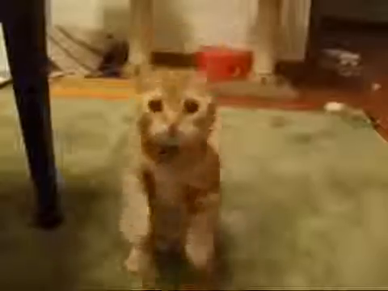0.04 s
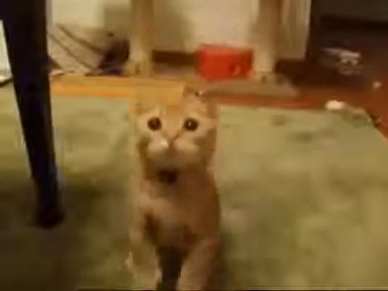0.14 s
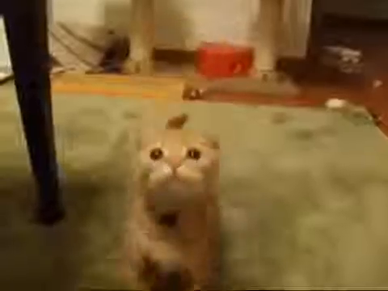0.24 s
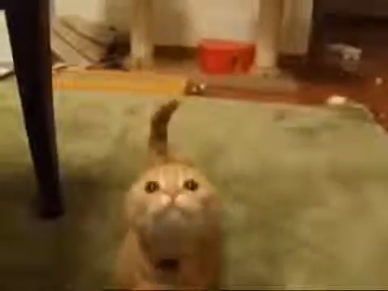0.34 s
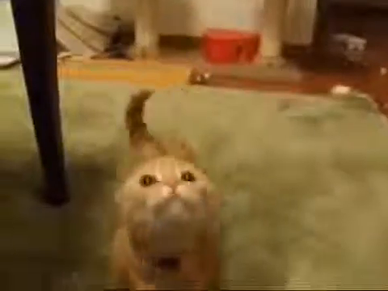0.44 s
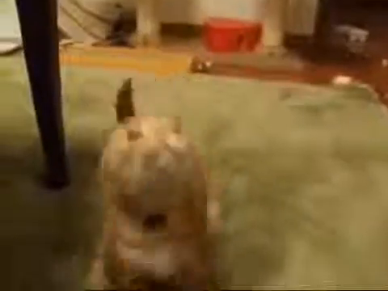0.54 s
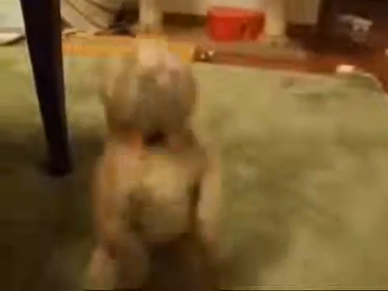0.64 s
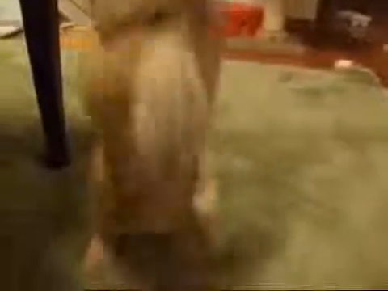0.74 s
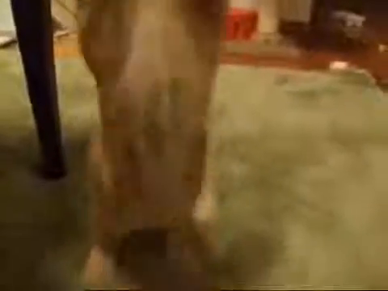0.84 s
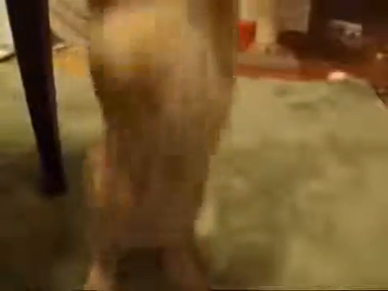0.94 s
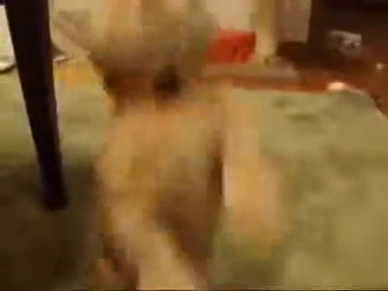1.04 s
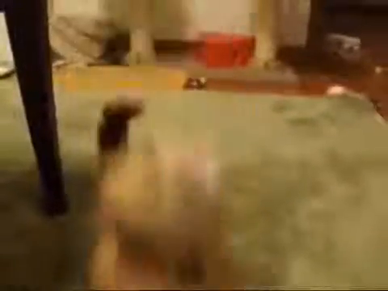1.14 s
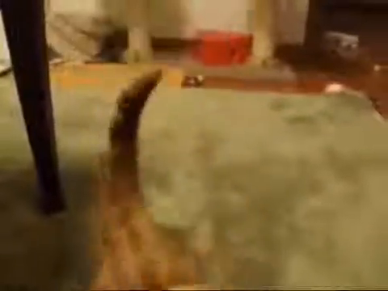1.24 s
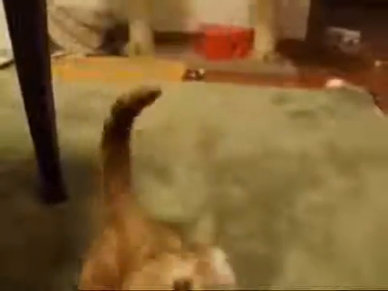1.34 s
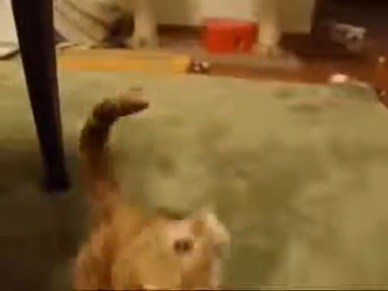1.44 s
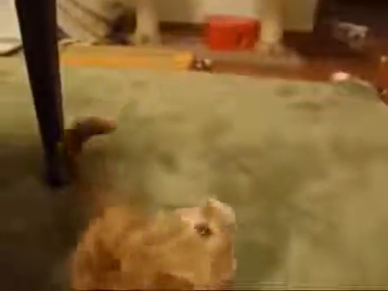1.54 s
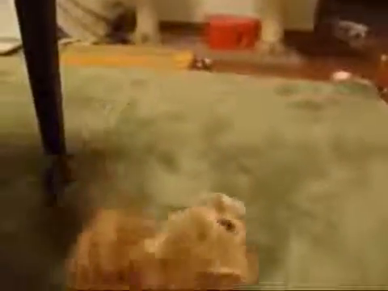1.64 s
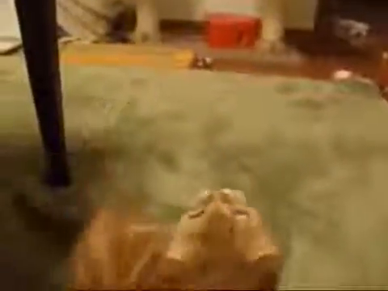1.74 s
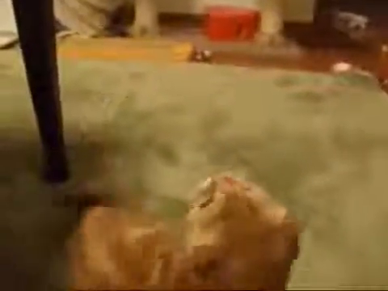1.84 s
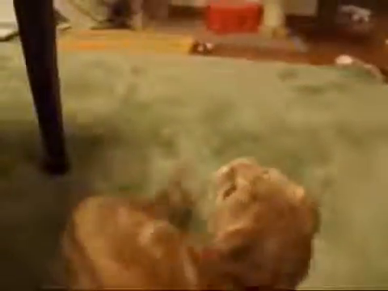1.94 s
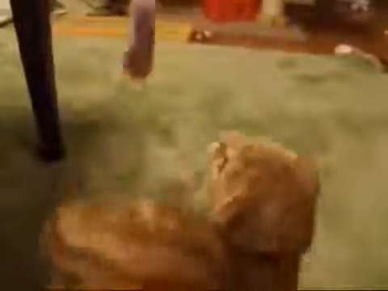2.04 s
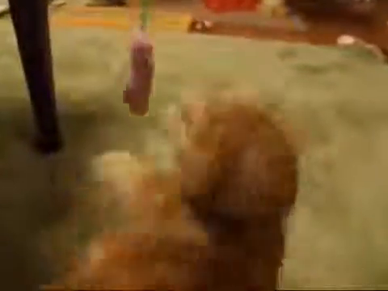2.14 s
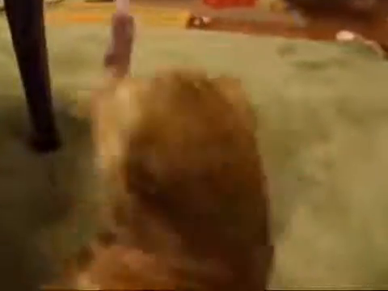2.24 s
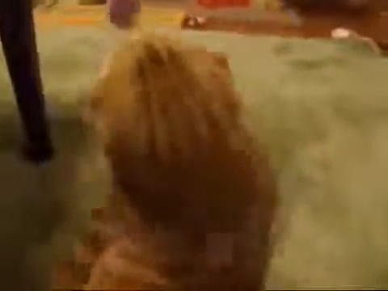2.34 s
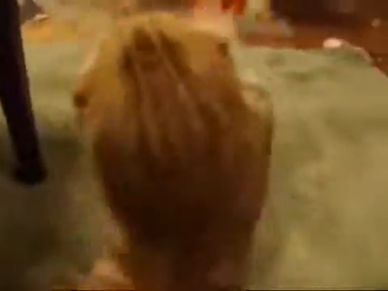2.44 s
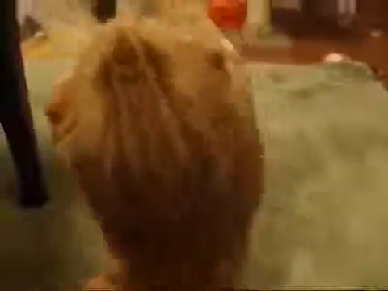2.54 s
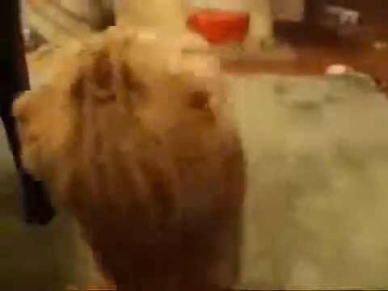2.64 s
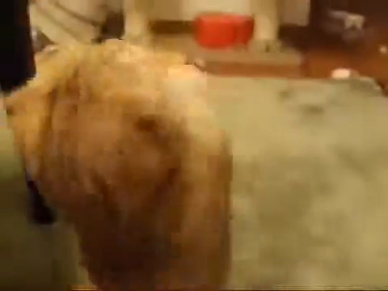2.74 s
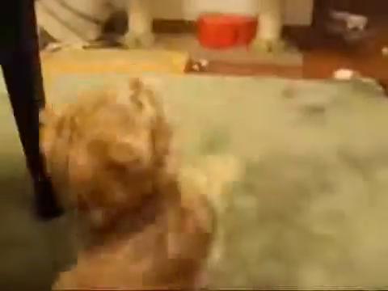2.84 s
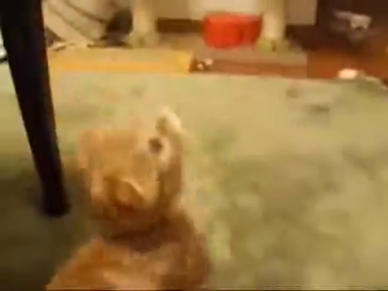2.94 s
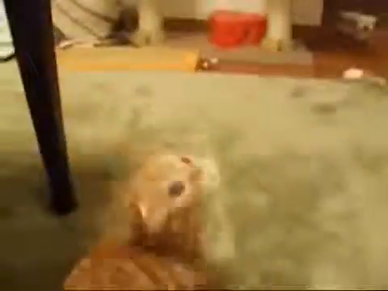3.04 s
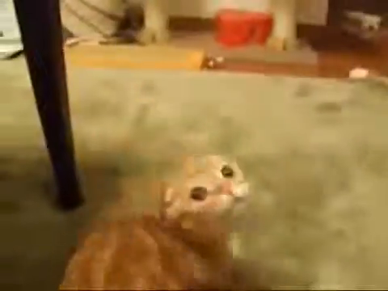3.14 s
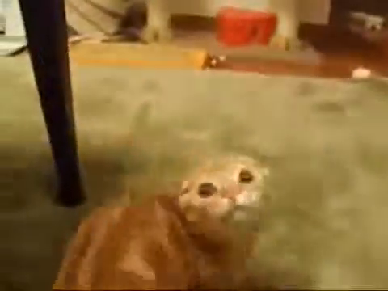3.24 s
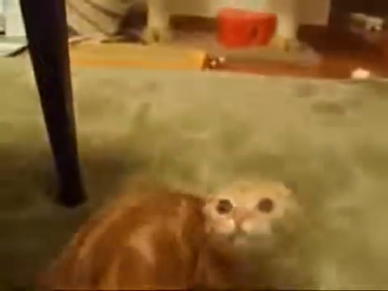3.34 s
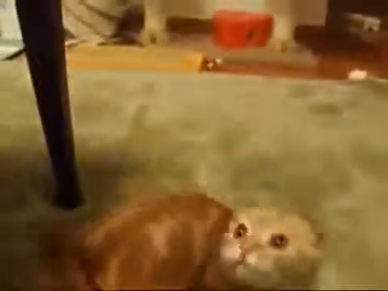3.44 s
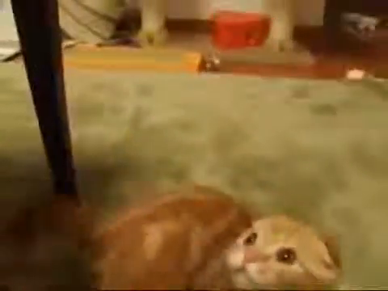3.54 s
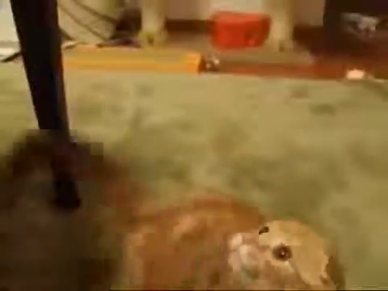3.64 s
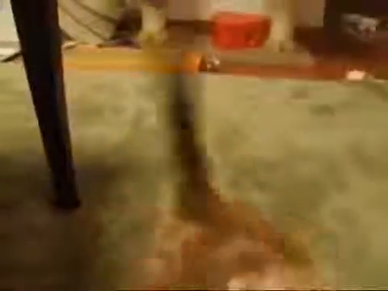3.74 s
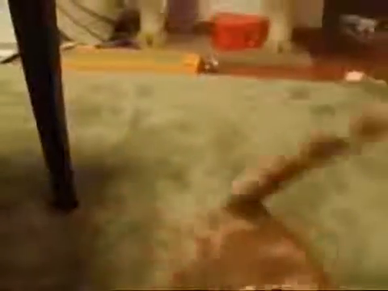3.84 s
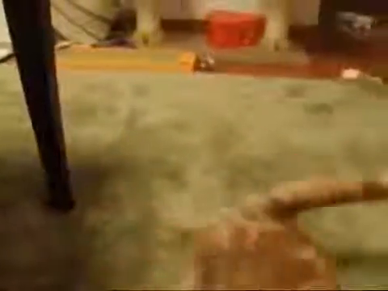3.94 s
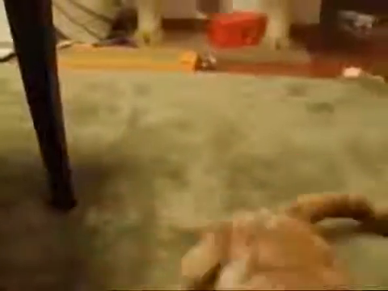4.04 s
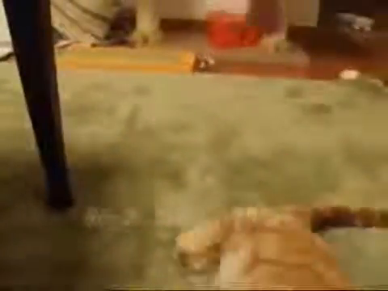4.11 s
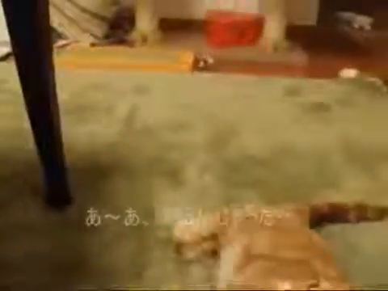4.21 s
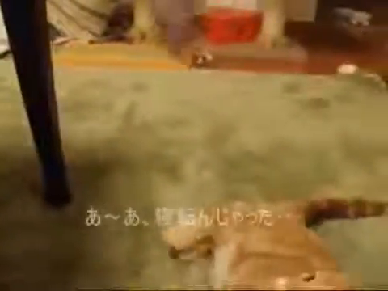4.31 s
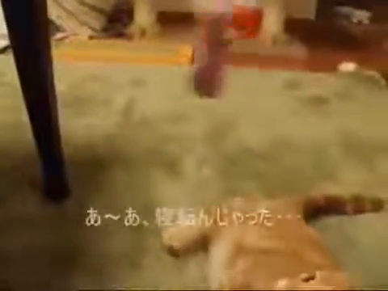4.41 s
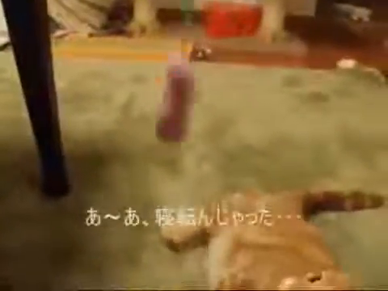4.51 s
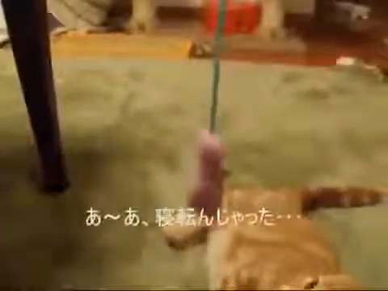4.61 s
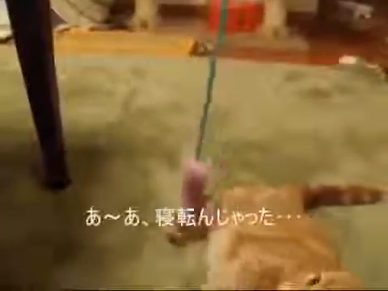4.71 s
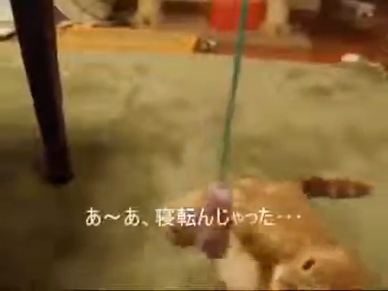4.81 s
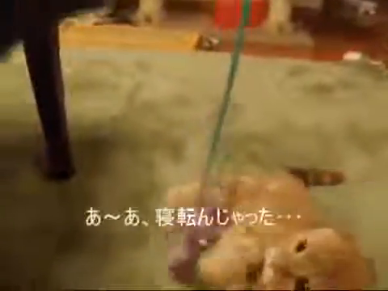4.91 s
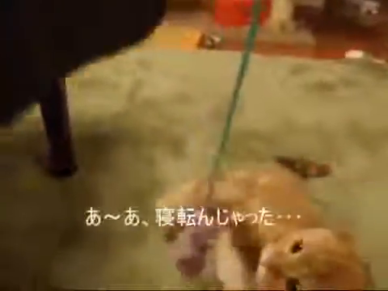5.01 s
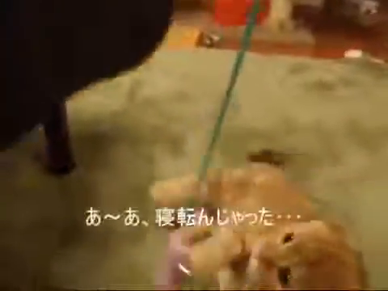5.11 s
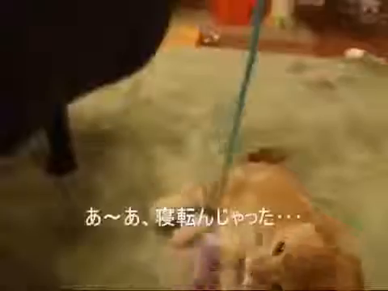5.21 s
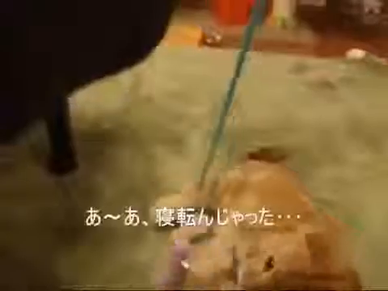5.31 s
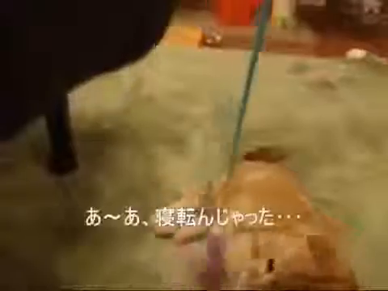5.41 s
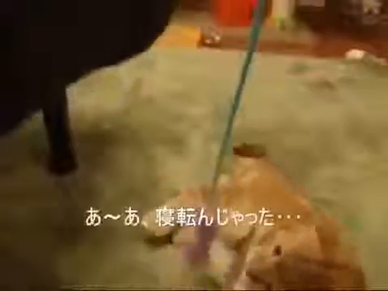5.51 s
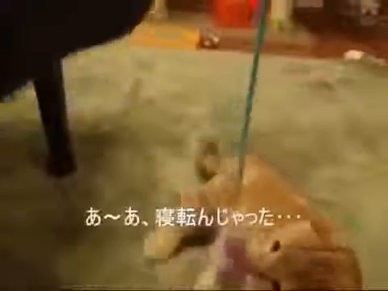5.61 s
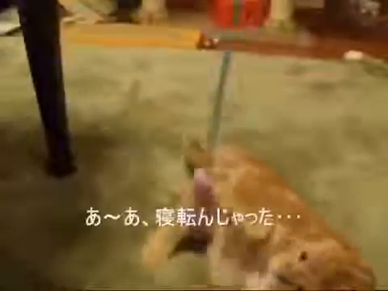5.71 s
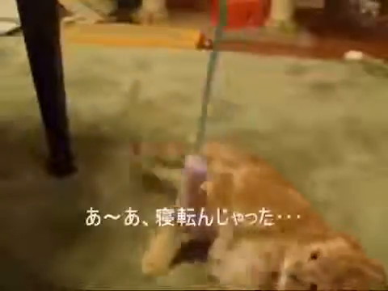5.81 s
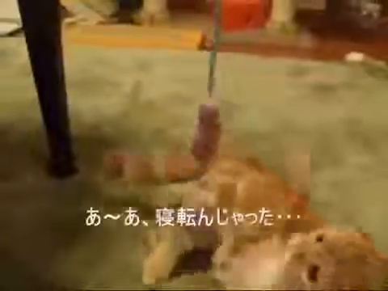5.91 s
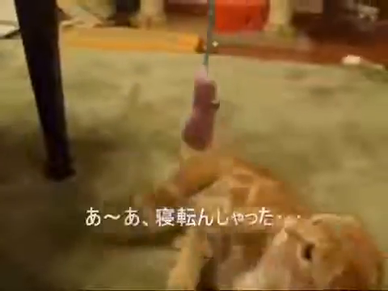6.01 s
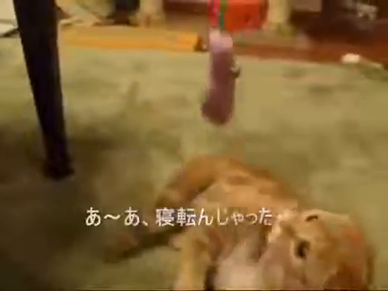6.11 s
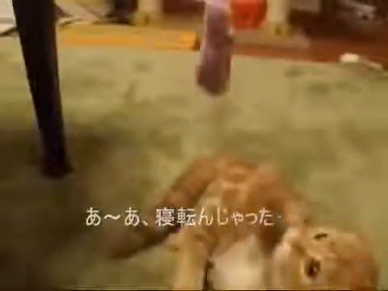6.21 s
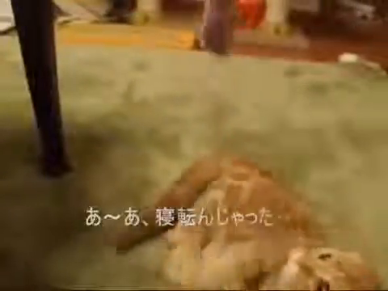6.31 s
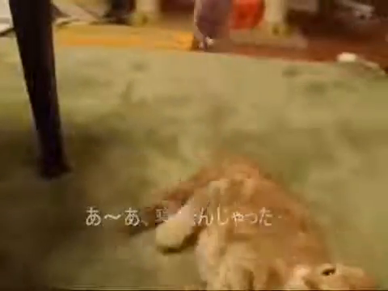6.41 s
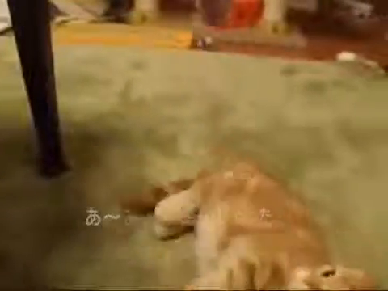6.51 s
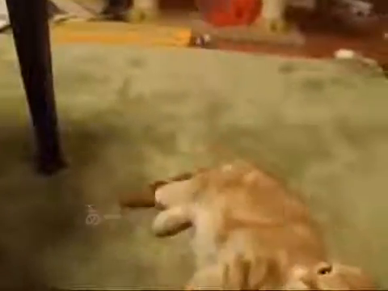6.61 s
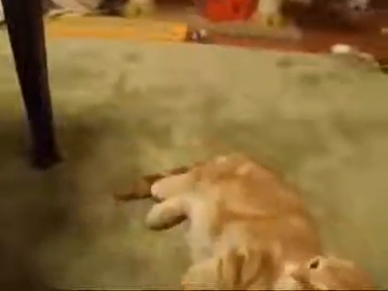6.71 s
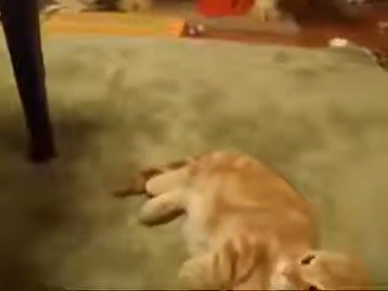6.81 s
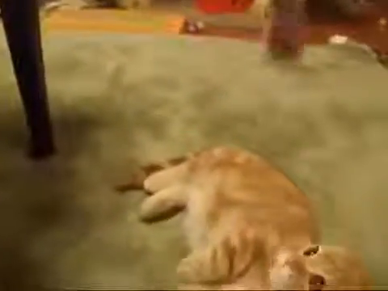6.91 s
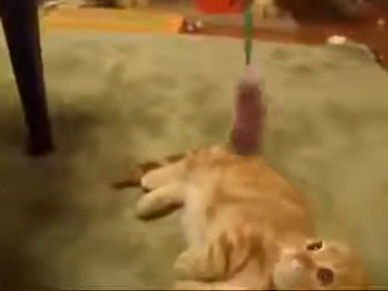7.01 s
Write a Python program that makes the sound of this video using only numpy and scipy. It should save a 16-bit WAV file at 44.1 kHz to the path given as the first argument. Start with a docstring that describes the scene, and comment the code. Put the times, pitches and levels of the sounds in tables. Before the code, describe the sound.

In a small carpeted room with gritty low-quality hiss, one dull paw fall comes first, then a faint airy wavering whoosh. A tiny toy bell starts jingling in short uneven bursts, pauses, then rattles densely and brighter as a kitten bats it. Two quick low wand flicks slip in among the jingles. The bell thins out, hush remains, and a last light tinkle ends it. Close, coarse microphone.

```python
"""A soft paw falls on a carpet, then a thin wand sings through the air: puffs of noise, then a wavering tone.
From about 1.2 s a small pellet bell jingles in bursts, densest from about 3.7 to 6.3 s, as the pellet
strikes and rattles in its shell; each blow is a sum of fading tones. The wand whips twice more after 5.3 s,
and one last light jingle comes at about 7 s. A noise hush with faint tones lies under it all.
A coarse 16 kHz, 8-bit converter makes the quiet gritty and mirrors the bell's sound about 8 kHz."""
import sys
import numpy as np
from scipy import signal
from scipy.fft import rfft, irfft, next_fast_len
from scipy.io import wavfile
from scipy.ndimage import uniform_filter1d

SR = 44100
rng = np.random.default_rng(int(sys.argv[2]) if len(sys.argv) > 2 else 0)


def dump_mix(stems):
    """Bounce the given channels to the path in sys.argv[1] as a 16-bit WAV at rate SR."""
    frames = np.atleast_2d(stems).T  # one column per channel
    limited = np.clip(frames, -1, 1)  # hard clip at full scale
    pcm = np.round(limited * 32767).astype(np.int16)
    wavfile.write(sys.argv[1], SR, pcm)


N = 311346

# clear pellet strikes: start_s, level_db (before the shell's own levels),
# free_s (longest free ring until the pellet lands again)
STRIKES = [(1.1662, -29.5, .017), (1.1858, -33.5, .0033), (1.1997, -35.5, .003), (1.2577, -30.5, .008),
           (1.2815, -28, .006), (1.3243, -36, .005), (1.3728, -27, .0045), (1.3926, -33, .0056),
           (1.4001, -35.5, .009), (1.527, -25.5, .0044), (1.616, -43.5, .003), (1.6676, -40.5, .003),
           (1.6861, -40, .0035), (1.732, -32, .003), (2.1297, -30.5, .0175), (2.1741, -20, .008),
           (2.2303, -24, .006), (2.2481, -29, .0035), (2.2547, -28.5, .005), (2.2654, -33.5, .006),
           (2.4431, -31, .005), (2.512, -28, .008), (2.5176, -31, .026), (2.5581, -33, .002),
           (2.576, -38.5, .0046), (2.6418, -26.5, .004), (2.6464, -26.5, .0065), (2.6626, -29, .01),
           (2.669, -28.5, .007), (2.7104, -25.5, .0086), (2.7304, -33, .011), (2.7787, -36, .004),
           (2.7938, -32.5, .0037), (2.8468, -40, .0025), (2.8744, -30, .006), (2.8782, -31.5, .009),
           (2.885, -31, .005), (2.9218, -30.5, .006), (2.985, -31.5, .006), (3.0267, -33.5, .0046),
           (3.102, -40, .003), (3.7766, -30, .018), (3.8067, -25.5, .0094), (3.8275, -19.5, .007),
           (3.8331, -19, .0076), (3.8437, -20, .0037), (3.8481, -22, .016), (3.8808, -30.5, .008),
           (3.9086, -29.5, .004), (3.9246, -28, .0085), (3.9309, -30, .0087), (3.9401, -26.5, .003),
           (3.9458, -25, .005), (3.9542, -30.5, .01), (4.0481, -32, .009), (4.1181, -29, .0064),
           (4.1225, -30.5, .004), (4.1602, -32.5, .014), (4.2184, -19, .016), (4.2645, -23, .0064),
           (4.274, -20.5, .0056), (4.2807, -26, .008), (4.2858, -19.5, .007), (4.2931, -26, .005),
           (4.3221, -32.5, .006), (4.3348, -32.5, .006), (4.3663, -37, .003), (4.4099, -32, .007),
           (4.4146, -28, .01), (4.4208, -29, .005), (4.4264, -26.5, .0106), (4.4341, -25.5, .0076),
           (4.462, -31.5, .011), (4.495, -31, .0036), (4.5075, -16.5, .005), (4.513, -21.5, .004),
           (4.5185, -20.5, .0063), (4.6106, -31, .013), (4.6253, -24, .006), (4.6297, -23.5, .007),
           (4.6391, -22, .013), (4.6616, -32, .01), (4.6679, -30.5, .028), (4.7346, -32.5, .005),
           (4.7395, -22, .008), (4.7489, -17.5, .013), (4.7577, -20, .0115), (4.7821, -34.5, .005),
           (4.8872, -31.5, .005), (4.983, -39.5, .004), (5.0374, -35.5, .014), (5.048, -33, .009),
           (5.0619, -29.5, .0166), (5.075, -29, .007), (5.1176, -24.5, .0063), (5.148, -28.5, .006),
           (5.1527, -23.5, .003), (5.1566, -21, .0043), (5.1738, -26.5, .0105), (5.1826, -13, .0064),
           (5.1926, -16.5, .01), (5.2026, -23, .0055), (5.2098, -31.5, .005), (5.2721, -32, .0054),
           (5.295, -23.5, .0105), (5.3034, -24.5, .011), (5.4238, -33, .004), (5.43, -31, .0074),
           (5.4352, -24.5, .006), (5.5141, -25.5, .01), (5.5435, -28.5, .003), (5.5555, -22, .005),
           (5.6125, -22.5, .004), (5.6175, -24.5, .008), (5.6239, -25, .0043), (5.6303, -29.5, .004),
           (5.6475, -31, .0165), (5.7159, -35, .005), (5.7248, -25.5, .01), (5.7328, -21.5, .0047),
           (5.7406, -19.5, .005), (5.7476, -29.5, .007), (5.7659, -27, .006), (5.7826, -31.5, .0054),
           (5.7935, -24.5, .01), (5.8046, -33.5, .0035), (5.953, -30, .0047), (5.9726, -28.5, .004),
           (5.9777, -28.5, .0056), (5.9899, -31.5, .0034), (6.017, -29.5, .0054), (6.0234, -32.5, .0033),
           (6.0435, -28, .009), (6.0552, -31.5, .0047), (6.0604, -31, .012), (6.177, -39.5, .003),
           (6.2065, -33, .004), (6.2796, -36.5, .0045), (7.0163, -37.5, .039)]
# tones of the shell at rest, main tone first: pitch_hz, level_db (added to the blow's), t60_s (time to fade 60 dB)
SHELL_TONES = [(7780, 5, 0.065), (7896, -9, 0.036), (7958, -6.5, .04), (7506, -15, .03), (7200, -25, .02),
               (6715, -26, 0.014)]
CONTACT_S = .0008  # how long the pellet pushes on the shell


def gain(db):
    """Turn decibels into a multiplier."""
    return 10 ** (np.asarray(db) / 20)


def fade(t, t60_s):
    """Exponential decay that drops 60 dB in t60_s seconds."""
    return np.exp(-np.log(1000) * t / t60_s)


def curve(rows, size):
    """Columns of a table joined by straight lines, with a gate that is 1 inside its span."""
    t = np.arange(size) / SR
    start_s, *columns = np.transpose(rows)
    gate = (t >= start_s[0]) & (t <= start_s[-1])
    return [np.interp(t, start_s, column) for column in columns], gate


def walk(rate_hz):
    """Random levels around 0, rate_hz new ones a second, joined by straight slopes."""
    hold = int(SR / rate_hz)
    steps = np.repeat(rng.standard_normal(N // hold + 1), hold)
    return uniform_filter1d(steps, hold)[:N]


def bell():
    """Pellet blows ring the shell; each one stifles the ring before it and is followed by a small rebound."""
    # slow drift of the main tone: start_s, pitch_hz
    ring_pitch = [(1.17, 7750), (1.26, 7790), (1.8, 7810), (2.13, 7747), (2.75, 7762), (3.0, 7704),
                  (3.8, 7753), (5.6, 7743), (5.8, 7790), (7.0, 7767)]
    strike_detune_hz, tap_detune_hz = 21.99, 60.26  # spread with the pellet's place and the swing
    rebound_db, rebound_scatter_db = -13.5, 10  # relative to the blow; up to 10 dB weaker still
    rebound_wait_s, rebound_ring_s = .02, .004  # longest wait after the landing; free ring

    start_s, level_db, free_s = np.vstack([STRIKES, taps()]).T
    count = len(start_s)
    is_strike = np.arange(count) < len(STRIKES)
    spread_hz = np.where(is_strike, strike_detune_hz, tap_detune_hz)
    detune_hz = spread_hz * np.clip(rng.standard_normal(count), -2, 2)
    pitch_hz = np.interp(start_s, *np.transpose(ring_pitch)) + detune_hz
    chance = rng.random((count, 2))
    phases = rng.random((count, 2, len(SHELL_TONES)))
    spots = np.clip(rng.standard_normal((count, len(SHELL_TONES) - 1)), -2, 2)

    # a free ring lasts no longer than the wait for the next blow
    played = np.isfinite(level_db)
    landings = np.append(np.sort(start_s[played]), np.inf)
    next_landing = landings[np.searchsorted(landings[:-1], start_s, "right")]
    free_s = np.clip(free_s, 0, next_landing - start_s)

    out = np.zeros(N + SR)
    for k in np.flatnonzero(played):
        wait, weakness = chance[k]
        small_db = level_db[k] + rebound_db - rebound_scatter_db * weakness
        rebound_start = start_s[k] + free_s[k] + rebound_wait_s * wait
        blow = strike(level_db[k], pitch_hz[k], free_s[k], phases[k, 0], spots[k])
        rebound = strike(small_db, pitch_hz[k], rebound_ring_s, phases[k, 1], spots[k])
        for when, ring in ((start_s[k], blow), (rebound_start, rebound)):
            first = int(when * SR)
            out[first:first + len(ring)] += ring
    return out[:N]


def taps():
    """The skittering pellet taps at uneven gaps, silent while a clear strike rings; rows as in STRIKES."""
    # spells of light rattling: start_s, length_s, first_level_db, last_level_db (before scatter and shell levels)
    rattles = [(1.153, .012, -46, -45), (1.265, .03, -42, -44.5), (1.383, .04, -44.5, -42.5),
               (1.446, 0.0052, -44.5, -43.5), (1.522, .022, -40.5, -48.5), (1.737, .036, -37, -43.5),
               (2.121, 0.0071, -45.5, -51), (2.142, .03, -40.5, -37), (2.183, 0.034, -40, -44.5),
               (2.244, 0.058, -38, -46), (2.45, .008, -39, -39), (2.487, .022, -41, -39),
               (2.564, .008, -39.5, -38), (2.655, .03, -38.5, -46.5), (2.705, .006, -44, -46),
               (2.723, .035, -36.5, -42), (2.798, .005, -40, -41), (2.98, 0.026, -40.5, -45),
               (3.015, 0.025, -36, -38.5), (3.116, 0.0044, -41.5, -43.5), (3.725, .02, -47, -48.5),
               (3.75, .024, -36, -32.5), (3.817, 0.007, -34.5, -32), (3.865, 0.062, -34, -36.5),
               (3.981, .03, -40.5, -47), (4.011, .057, -35, -37.5), (4.088, .028, -46.5, -45),
               (4.128, 0.06, -37.5, -39.5), (4.246, .018, -45, -38), (4.293, .036, -35, -42.5),
               (4.39, .016, -41.5, -42.5), (4.445, .058, -41.5, -45), (4.534, .055, -36.5, -48),
               (4.597, .014, -38.5, -35), (4.699, .03, -45.5, -42), (4.772, .09, -41.5, -41.5),
               (4.895, 0.0077, -40.5, -47), (4.999, .034, -45, -43.5), (5.086, .05, -45.5, -38),
               (5.165, .008, -37.5, -38), (5.217, .075, -33.5, -38), (5.316, .042, -35, -44.5),
               (5.477, .06, -38, -34.5), (5.562, .048, -40, -36.5), (5.638, .075, -34.5, -42.5),
               (5.814, .012, -42.5, -38), (5.86, .034, -36.5, -36.5), (5.93, .075, -38.5, -36.5),
               (6.027, .014, -32.5, -38), (6.081, .013, -43, -40), (6.203, .04, -40, -45.5),
               (6.267, .005, -45.5, -44), (6.99, .023, -43.5, -39)]
    gap_s, ring_s, uneven = .0065, .006, .45  # middle gap and free ring; how far both stray (log scale)
    scatter_db = 2.5

    begin_s, length_s, first_db, last_db = np.transpose(rattles)[:, :, None]
    draws = rng.uniform(-1, 1, (len(rattles), 40, 3))  # at most 40 taps in each rattle
    gap, size, ring = np.moveaxis(draws, 2, 0)
    gaps_s = gap_s * np.exp(uneven * gap)
    tap_s = begin_s + np.cumsum(gaps_s, axis=1) - gaps_s[:, :1]  # the first tap opens the rattle
    progress = (tap_s - begin_s) / length_s
    level_db = first_db + (last_db - first_db) * progress
    level_db = level_db + np.sqrt(3) * scatter_db * size  # root 3 makes the typical spread scatter_db

    strike_s, _, free_s = np.transpose(STRIKES)
    after_hit = tap_s[..., None] > strike_s - CONTACT_S
    before_landing = tap_s[..., None] < strike_s + free_s
    ringing = np.any(after_hit & before_landing, axis=2)
    heard = (tap_s < begin_s + length_s) & ~ringing
    level_db = np.where(heard, level_db, -np.inf)
    return np.stack([tap_s, level_db, ring_s * np.exp(uneven * ring)], axis=2).reshape(-1, 3)


def strike(level_db, pitch_hz, free_s, phase, spot):
    """One blow: the shell's tones swell over the contact, ring freely, then die fast once the pellet lands."""
    stifled_t60_s = .022  # decay while the pellet lies on the shell
    spot_db = 5  # the struck spot favours some side tones over others

    t = np.arange(int(.09 * SR)) / SR
    swell = np.sin(np.pi / 2 * np.clip(t / CONTACT_S, 0, 1)) ** 2
    shape = swell * fade(np.maximum(t - free_s, 0), stifled_t60_s)
    rest_hz, tone_db, t60_s = np.transpose(SHELL_TONES)[:, :, None]
    # the pellet's place and the swing detune all tones alike
    tone_hz = rest_hz * pitch_hz / rest_hz[0]
    turns = tone_hz * t + phase[:, None]
    favour_db = spot_db * np.append(0, spot)[:, None]
    size = gain(level_db + tone_db + favour_db)
    return shape * np.sum(size * fade(t, t60_s) * np.sin(2 * np.pi * turns), axis=0)


def wand():
    """Air swirls leave the rod at a rate that follows its speed: a tone, breathy when they are unsteady."""
    # one list of points for each whip: start_s, pitch_hz (before waver), level_db (rms), waver (share of the pitch)
    whips = [
        [(.92, 672, -76, .2), (.96, 698, -59.5, 0.17), (1.05, 750, -57.5, 0.21), (1.14, 765, -58, .2),
         (1.18, 790, -73, .2)],
        [(5.322, 260, -67, 0.06), (5.335, 284, -45.5, 0.05), (5.356, 356, -50, 0.04), (5.375, 353, -45.5, 0),
         (5.392, 291, -45.5, 0.06), (5.405, 270, -72, 0.06)],
        [(5.54, 385, -71, 0.02), (5.553, 360, -46.5, 0.03), (5.572, 307, -42.5, 0.05), (5.585, 256, -52, 0.02),
         (5.597, 234, -78, .01)],
    ]
    out = 0
    for rows in whips:
        (pitch_hz, level_db, waver), gate = curve(rows, size=N)
        wavering_hz = pitch_hz * (1 + waver * walk(300))
        phase = 2 * np.pi * np.cumsum(wavering_hz) / SR
        out = out + np.sqrt(2) * gain(level_db) * gate * np.sin(phase)
    return out


def paws():
    """Soft paw falls on the carpet: dull puffs of noise that die quickly."""
    # start_s, level_db (peak), pitch_hz (middle of the noise band), t60_s (time to fade 60 dB)
    paw_falls = [(0.556, -40, 328, 0.051)]
    out, t = 0, np.arange(N) / SR
    for start_s, level_db, pitch_hz, t60_s in paw_falls:
        puff = rng.standard_normal(N) * (t > start_s) * fade(np.maximum(t - start_s, 0), t60_s)
        band = signal.butter(2, [pitch_hz / 1.4, pitch_hz * 1.6], "bandpass", fs=SR, output="sos")
        puff = signal.sosfilt(band, puff)
        out = out + gain(level_db) * puff / np.abs(puff).max()
    return out


def echo(x):
    """Walls and furniture add a short blurred tail that starts after the first bounce off the floor."""
    echo_db, echo_t60_s = -17.5, .4
    t = np.arange(SR // 2) / SR
    tail = rng.standard_normal(len(t)) * fade(t, echo_t60_s) * (t > .003)
    tail = tail / np.sqrt(np.sum(tail ** 2))
    return x + gain(echo_db) * signal.fftconvolve(x, tail)[:N]


def room():
    """Room hush: noise shaped by pitch that swells a little, plus a wavering hum and faint steady tones."""
    # colour of the hush: pitch_hz, level_db (per Hz, relative)
    hush_colour = [(20, -0.5), (100, -4.5), (150, -7.5), (280, -5), (500, -8.5), (1000, -10.5),
                   (2000, -12.5), (4000, -15), (8000, -16.5), (9000, -49)]
    # faint wavering hum: pitch_hz, width_hz, level_db (rms)
    hums = [(279.7, 30, -67.5)]
    # steady faint tones: pitch_hz, level_db (rms)
    steady_tones = [(102.3, -70.5), (7678, -69), (7708, -70), (7737, -77.5)]
    hush_db, swell_db = -54.5, 0.5

    colour_hz, colour_db = np.transpose(hush_colour)
    size = next_fast_len(N)
    f = np.maximum(np.arange(size // 2 + 1) * SR / size, 1)
    colour = gain(np.interp(np.log(f), np.log(colour_hz), colour_db))
    hush = irfft(rfft(rng.standard_normal(size)) * colour, size)[:N]
    out = hush / np.std(hush) * gain(hush_db + swell_db * walk(5.6))
    for pitch_hz, width_hz, level_db in hums:
        b, a = signal.iirpeak(pitch_hz, pitch_hz / width_hz, fs=SR)
        hum = signal.lfilter(b, a, rng.standard_normal(N))
        out = out + gain(level_db) * hum / np.std(hum)
    t = np.arange(N) / SR
    for pitch_hz, level_db in steady_tones:
        out = out + np.sqrt(2) * gain(level_db) * np.sin(2 * np.pi * (pitch_hz * t + rng.random()))
    return out


def scene():
    """The bell, wand and paws echo in the room; the hush is added dry."""
    return (echo(bell() + wand() + paws()) + room())[None, :]


def record(dry):
    """16 kHz, weak guard filter, 8 bits rounded down; holding each sample mirrors the spectrum about 8 kHz."""
    lopsided = 0.047  # square-law bend of the microphone amplifier
    converter_hz, steps, offset_steps = 16000, 128, .08  # steps per unit of level; zero error in steps
    top_hz = 14900

    bent = dry + lopsided * dry ** 2
    # go to 32 kHz, then drop every other sample unfiltered, so sound above 8 kHz folds down
    slow = signal.resample_poly(bent, up=320, down=441, axis=1)[:, ::2]
    slow = np.floor(slow * steps + offset_steps) / steps
    held_index = np.minimum(np.arange(N) * converter_hz // SR, slow.shape[1] - 1)
    held = slow[:, held_index]
    return signal.sosfilt(signal.ellip(10, .2, 70, top_hz, fs=SR, output="sos"), held)


dry = scene()
out = record(dry)
dump_mix(out)
```